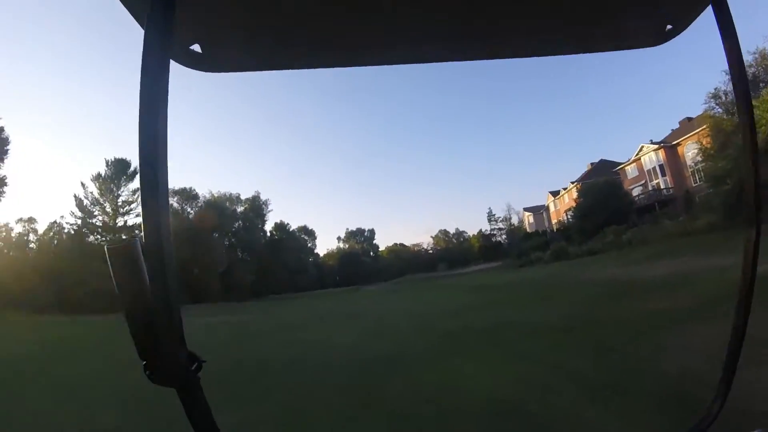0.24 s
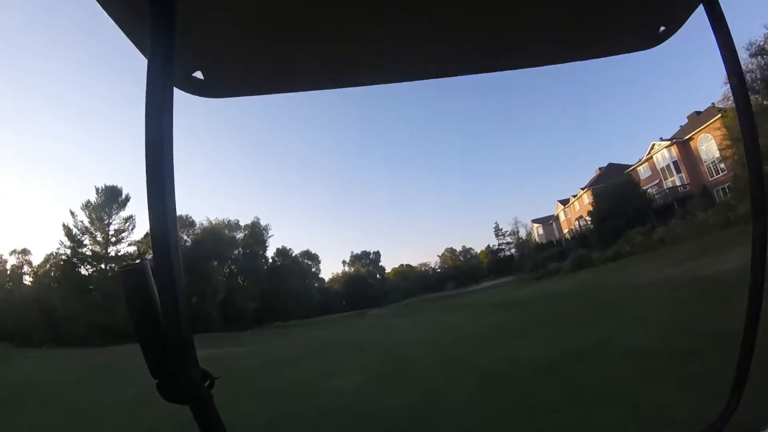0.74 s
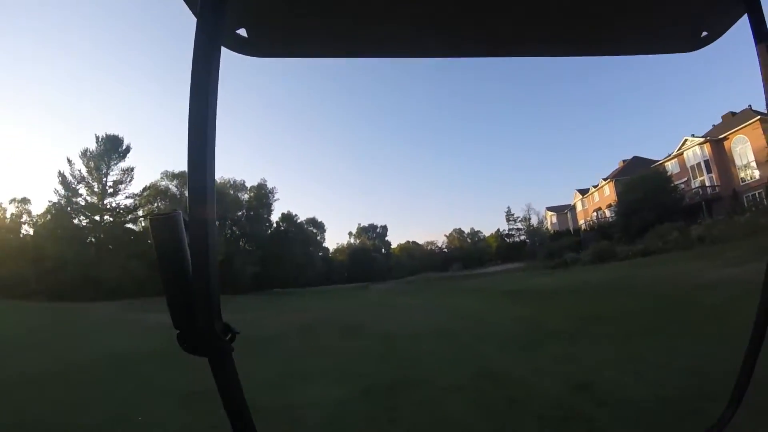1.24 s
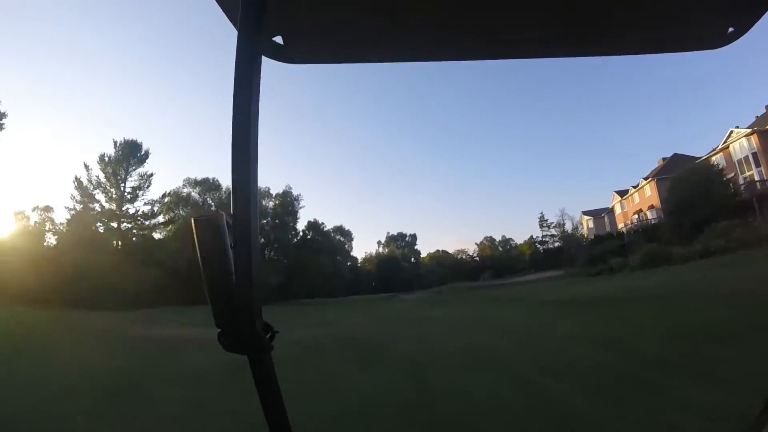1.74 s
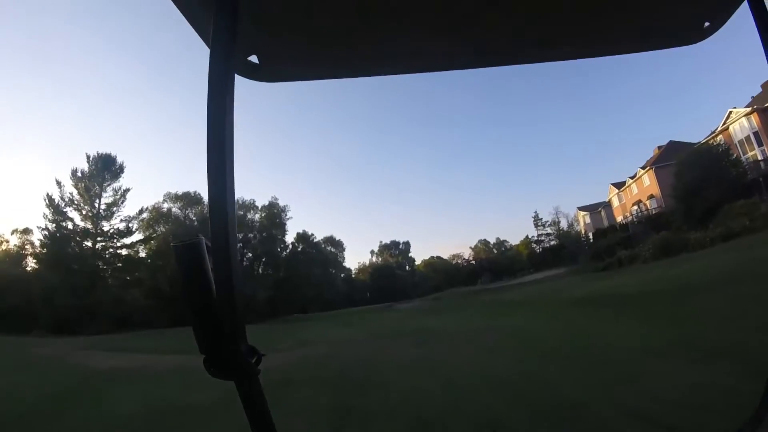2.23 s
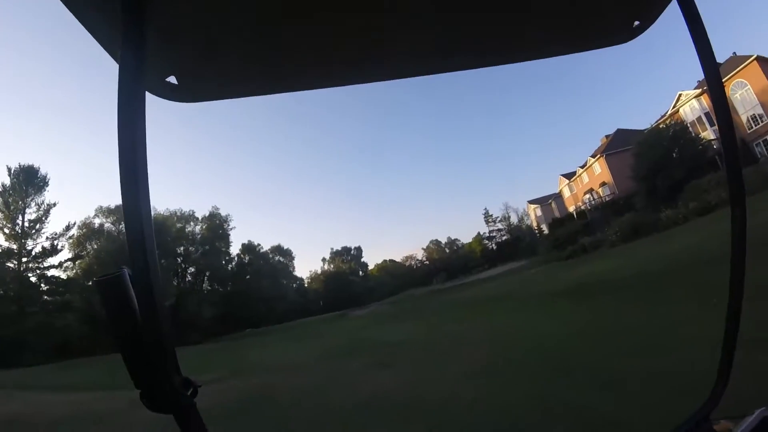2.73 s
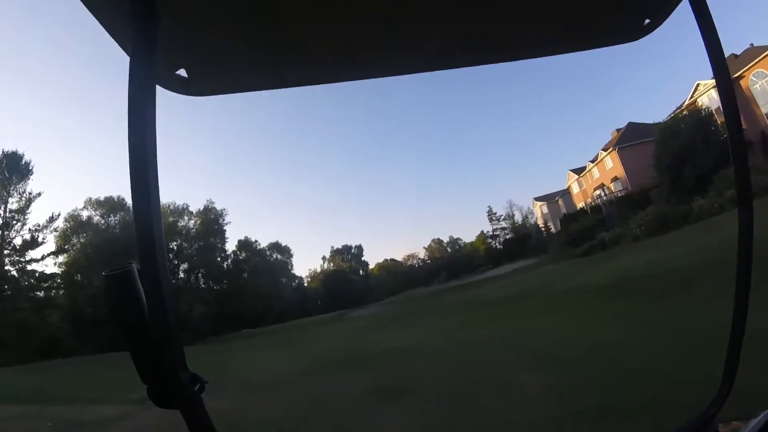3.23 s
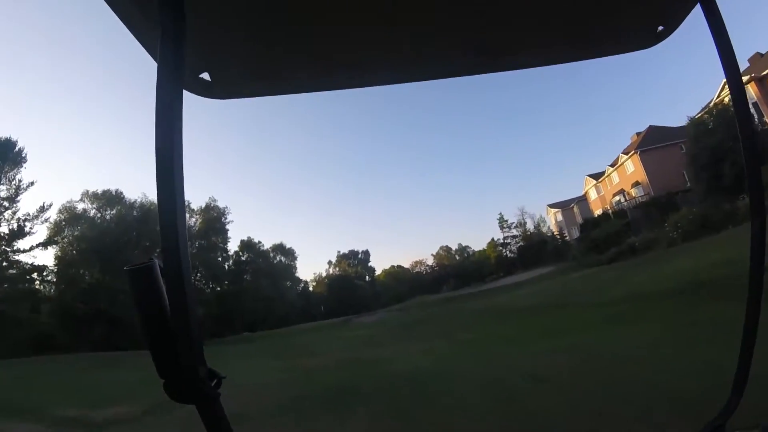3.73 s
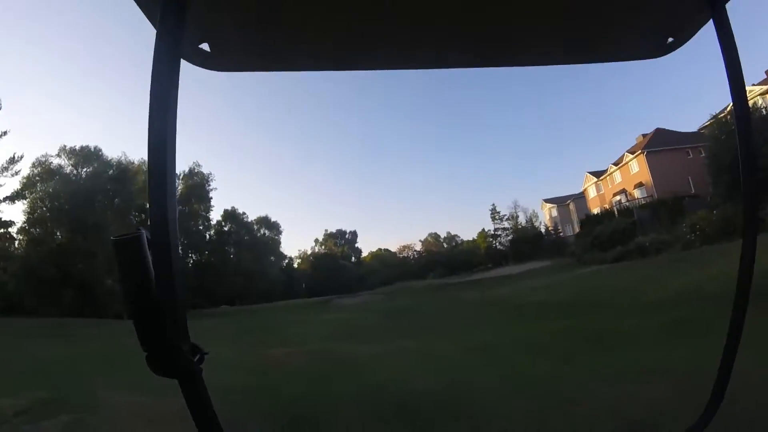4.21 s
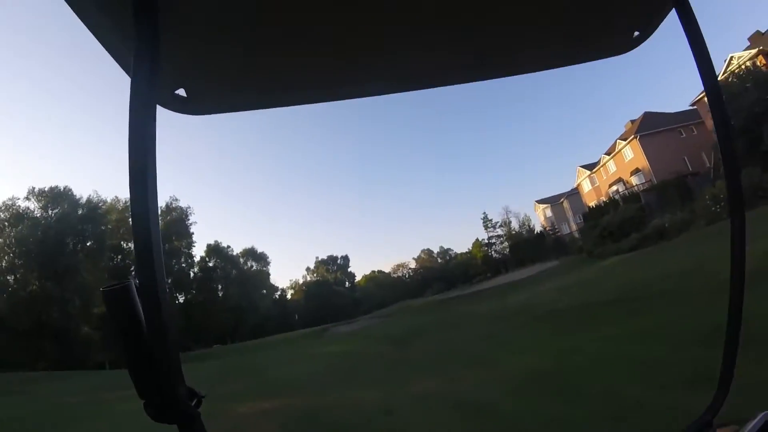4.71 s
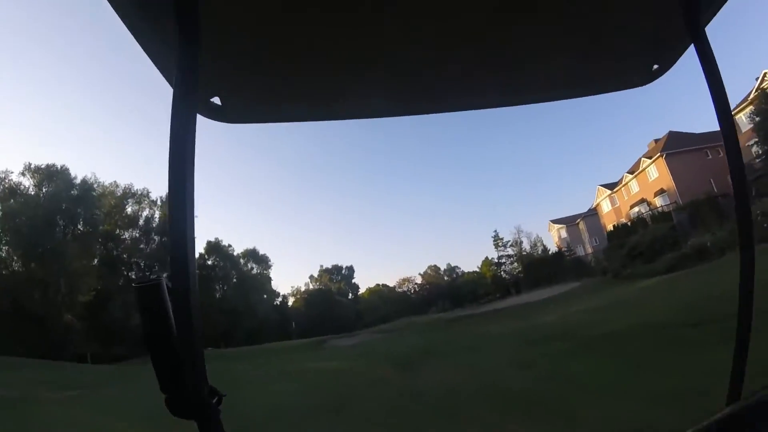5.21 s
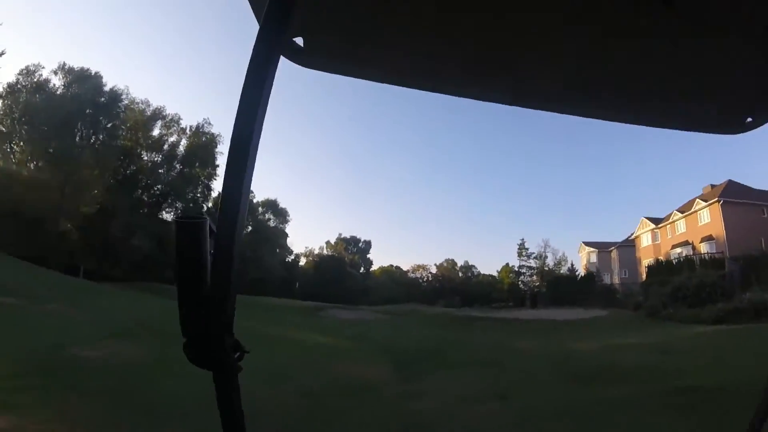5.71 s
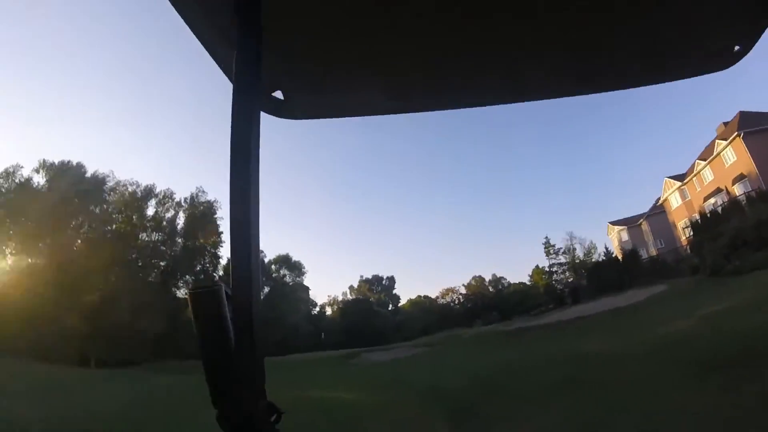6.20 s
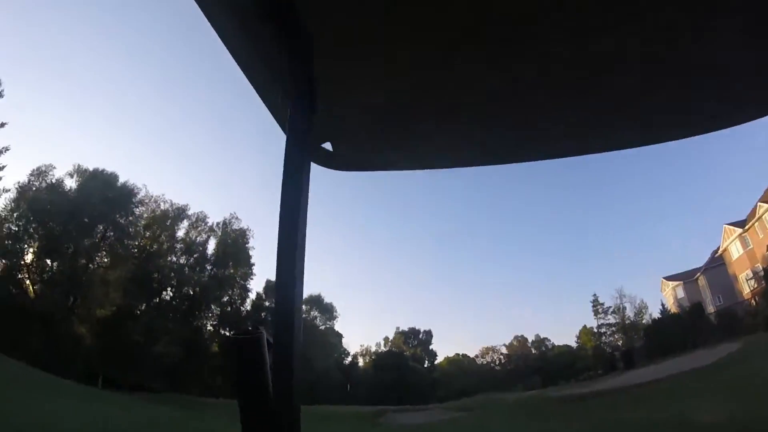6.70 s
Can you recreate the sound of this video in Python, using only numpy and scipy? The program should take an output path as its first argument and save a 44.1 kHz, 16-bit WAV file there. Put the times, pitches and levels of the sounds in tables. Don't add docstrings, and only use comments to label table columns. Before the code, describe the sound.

Low, boomy one-cylinder chugging and dull tyre roar on a small cart, deep bumps and plastic rattles, finishing with heavy knocks on the microphone's case.

```python
import sys
import numpy as np
from scipy import signal
from scipy.io import wavfile
from scipy.ndimage import uniform_filter1d

SR = 44100
rng = np.random.default_rng(int(sys.argv[2]) if len(sys.argv) > 2 else 0)


def wrap_up_sound(samples):
    columns = np.atleast_2d(samples).T
    tamed = np.clip(columns, -1, 1)
    steps = np.round(tamed * 32767).astype(np.int16)
    wavfile.write(sys.argv[1], SR, steps)


def rack_gain(trim_db):
    fader = np.asarray(trim_db, float)
    return 10 ** (fader / 20)


N = 306495


def in_time(rows):
    s, *columns = np.transpose(rows)
    return [np.interp(np.arange(N) / SR, s, c) for c in columns]


def rms_one(x):
    return x / np.sqrt(np.mean(x ** 2) + 1e-20)


def band_pass(x, order, edges_hz):
    return signal.sosfilt(signal.butter(order, edges_hz, "band", fs=SR, output="sos"), x)


def drift(rate_hz):
    r = np.exp(-80 * np.pi * rate_hz / SR)
    draws = rng.standard_normal(N // 40 + 2002)
    slow = signal.lfilter([1], [1, -2 * r, r * r], draws)[2000:]
    return np.interp(np.arange(N) / 40, np.arange(len(slow)), rms_one(slow))


def ring(clicks, hz, t60):
    r, w = rack_gain(-60 / (t60 * SR)), 2 * np.pi * hz / SR
    return signal.lfilter([0, np.sin(w)], [1, -2 * r * np.cos(w), r * r], clicks + 1e-18)


def resonance(x, hz, width):
    r = np.exp(-np.pi * width / SR)
    poles = [1, -2 * r * np.cos(2 * np.pi * hz / SR), r * r]
    return signal.lfilter(np.array([1, 0, -1]) * (1 - r * r) / 2, poles, x)


def add(track, at_s, sound):
    i = round(at_s * SR)
    track[i:i + len(sound)] += sound[:N - i]


# multiple of the firing rate, level in dB, start in turns.
SHAKE_ORDERS = [(1, -39, 0.14), (2, -16, 0.862), (3, -29.5, 0.43), (4, -29.5, 0.74)]
# time in seconds, gain in dB.
FRAME_UPTAKE = [(0, -0.5), (.3, -5.5), (.9, -2), (1.5, 1), (2.45, -2), (3.7, 2), (4.2, -2), (4.6, 2.5),
                (5.6, -2.5), (6.95, -5)]
# pitch in Hz, level in dB, t60 in seconds,
# delay in cycles.
ENGINE_MODES = [(117.4, -21, 0.064, 0.491), (165.3, -29, 0.17, .5), (188, -24.5, .16, .5),
                (241.5, -27, 0.15, 0.47), (384, -39, 0.39, .12),
                (852, -35, .13, .1)]


def engine(cycles, load_db):
    shake = 0
    for order, db, turn in SHAKE_ORDERS:
        shake = shake + rack_gain(db + drift(0.8)) * np.sin(2 * np.pi * (order * cycles + turn))
    out = rack_gain(in_time(FRAME_UPTAKE)[0]) * shake
    for hz, db, t60, late in ENGINE_MODES:
        jitter = 0.005 * drift(15)
        fired = np.diff(np.floor(cycles - late + jitter), prepend=0) > 0
        pulses = fired * rack_gain(1.4 * rng.standard_normal(N))
        out = out + rack_gain(db + load_db + 1.27 * drift(3.3)) * ring(pulses, hz, t60)
    return out


# time in seconds, teeth per second.
TOOTH_RATE = [(0, 132.2), (.75, 131.4), (1.1, 128.9), (2.2, 126.3), (3.4, 126.3), (4.5, 128.6),
              (5.2, 130.1), (5.65, 132.5), (6.05, 129.5), (6.95, 129.2)]
# multiple of the tooth rate, level in dB.
MESH_HARMONICS = [(3, -1), (4, -2), (5, -4), (6, -4), (7, -2.5), (8, -4), (11, -9), (19, -16), (23, -18)]
# time in seconds, level in dB.
TOOTH_TORQUE = [(0, 0.5), (1.2, -3.5), (2.3, 4.5), (3.3, -1.5), (4, -2.5), (5.5, 2), (6.2, -1), (6.95, 0)]


def gear():
    turns = np.cumsum(in_time(TOOTH_RATE)[0] * (1 + 0.001 * drift(6))) / SR
    lines = 0
    for k, db in MESH_HARMONICS:
        lines = lines + rack_gain(db + 3.0 * drift(3) - 2.5) * np.sin(2 * np.pi * k * turns)
    lines = lines + rack_gain(7) * resonance(lines, 865, 70)
    return rack_gain(-43.5 + in_time(TOOTH_TORQUE)[0]) * lines


# frequency in Hz, density in dB per Hz.
ROAR_SPECTRUM = [(55, -8), (98, -12), (190, -19.5), (323, -26), (420, -20), (740, -23.5), (1200, -29),
                 (2480, -34.5), (4000, -40), (4800, -60.5), (5700, -58.5), (8000, -57), (9800, -72.5),
                 (14000, -56.5)]
# pitch in Hz, width in Hz, level in dB.
CASE_RESONANCES = [(839.5, 47, 1.5), (6510, 520, 4.5), (11240, 260, -2.5),
                   (1290, 40, -4), (1435, 35, -1), (1755, 45, -1), (2140, 50, -4), (2300, 60, -3),
               (2510, 80, -1), (3015, 45, 0)]


def roar(cycles, firing):
    level_db, db_per_firing = -29, 3.5
    out, together, edges = 0, drift(9), 50 * 2 ** np.arange(0, 8.3, 1 / 3)
    white = rng.standard_normal((2, N))
    at_hz, density_db = np.transpose(ROAR_SPECTRUM)
    breath_db = 0.51 * np.cos(2 * np.pi * (cycles - 0.25))
    for k, (low, high) in enumerate(zip(edges, edges[1:])):
        band = band_pass(white[k % 2], 2, [low, high])
        colour_db = np.interp(np.log(low * high) / 2, np.log(at_hz), density_db)
        flicker_db = 0.45 * together + 0.38 * drift(7.4)
        out = out + band * rack_gain(colour_db + flicker_db + breath_db)
    out = out + sum(rack_gain(db) * resonance(out, hz, width) for hz, width, db in CASE_RESONANCES)
    return rack_gain(level_db + db_per_firing * (firing - firing.mean())) * rms_one(out)


# time in seconds, springs level in dB, frame level in dB.
GROUND_BUMPS = [(0.0, -23, -31), (.25, -21.5, -45), (.44, -21, -18.5), (.66, -35, -22), (.93, -13, -25),
                (1.11, -19, -34), (1.25, -40, -21.5), (1.47, -27, -23), (1.55, -14.5, -33),
                (2.08, -24, -37), (2.3, -29, -31), (2.48, -30, -16.5), (2.94, -12, -21), (3.36, -17, -31),
                (3.56, -19.5, -24), (3.88, -18.5, -36), (4.0, -36, -29), (4.22, -19.5, -22),
                (4.41, -15, -35), (4.93, -13, -34), (5.4, -30, -36), (5.62, -31, -32), (6.04, -28, -39),
                (6.55, -38, -19.5)]
# springs in seconds, frame in seconds.
SWELL_HALF_S = (0.087, 0.078)
# springs in dB, frame in dB.
TURF_LEVEL_DB = (-32.5, -34)


def bumps():
    out, t = 0, np.arange(N) / SR
    at_s, *levels_db = np.transpose(GROUND_BUMPS)
    bands_hz = [(13, 22.5), (24, 38.4)]
    for edges_hz, dbs, half, turf_db in zip(bands_hz, levels_db, SWELL_HALF_S, TURF_LEVEL_DB):
        deep = band_pass(rng.standard_normal(N + SR), 2, edges_hz)[SR:]
        even = deep / np.sqrt(uniform_filter1d(deep ** 2, size=8000) + 1e-12)
        swell = rack_gain(turf_db)
        for s, db in zip(at_s, dbs):
            swell = swell + rack_gain(db) * np.exp(-((t - s) / half) ** 2)
        out = out + swell * even
    return out


def blow(t, push_db, contact_ms, swing_db, hz, tick_db):
    contact = contact_ms / 1000
    push = -np.sin(np.pi * np.minimum(t / contact, 1)) ** 2
    later = np.maximum(t - 0.723 * contact, 0)
    swing = np.sin(2 * np.pi * hz * later) * rack_gain(-60 * later * hz / 4.56)
    lid = np.sin(2 * np.pi * 215 * later) * rack_gain(-60 * later / 0.087)
    swing = (swing + rack_gain(-19.5) * lid) * np.minimum(later / 0.001, 1)
    rough = 1 + 0.4 * rng.standard_normal(len(t))
    scrape = rough * np.sin(np.pi * np.minimum(t / 0.0007, 1))
    shell_hz = 800 + 2.7 * hz
    tick = -ring(scrape, shell_hz, 0.022) - rack_gain(-6) * ring(scrape, 640, 0.018)
    return rack_gain(push_db) * push + rack_gain(swing_db) * swing + rack_gain(tick_db - 19) * tick


# time in seconds, contact level in dB, swing level in dB,
# swing pitch in Hz.
HOLDER_RATTLES = [(0.064, -23, -20, 200), (0.101, -10, -27, 110), (0.241, -14, -18, 160),
                  (.47, -7.5, -18, 124), (.587, -13.5, -29, 159), (0.66, -13, -13, 135),
                  (.748, -10.5, -12, 162), (0.841, -17, -22, 150), (.909, -10, -14, 104),
                  (1.754, -28, -24, 270), (1.797, -29, -28, 270), (2.367, -3.5, -13.5, 116),
                  (2.4313, -4, -4.5, 80), (2.815, -12.5, -34, 220), (2.825, -29, -17, 188),
                  (2.881, -6.5, -6, 93), (2.967, -30, -22, 201), (3.15, -31, -35, 119),
                  (5.322, -30, -16, 102), (5.783, -7, -15, 189)]
# time in seconds, contact level in dB, contact in ms,
# swing level in dB, swing pitch in Hz.
HAND_KNOCKS = [
    (6.2205, -5, 4.5, 2, 92.6),
    (6.325, -15.5, 4, -4.5, 165),
    (6.5404, -11.5, 1.5, -6, 142),
    (6.603, -15, 3.8, -20, 101),
    (6.68, -41, 3, -9.5, 101),
    (6.769, -36, 2.9, -26, 202),
]
# start in seconds, level in dB, pitch in Hz, decay in seconds.
MOUNT_LURCHES = [(0.238, -12, 40.8, 0.05), (0.472, -14.5, 40, 0.12), (.909, -13, 39.3, 0.07),
                 (2.43, -14, 33.4, 0.18), (2.88, -18, 35.5, 0.21), (5.788, -24, 263, 0.18),
                 (5.794, -6.5, 73, 0.028), (6.33, -27, 252, 0.073), (6.339, -25, 60, 0.056),
                 (6.548, -24, 97.5, 0.56), (6.673, -8.5, 31.8, 0.19), (6.6759, -9.5, 80, 0.048),
                 (6.73, -17, 87, 0.19), (6.762, -21, 224.4, 0.064), (6.786, -21, 147, 0.073)]


def knocks():
    out, t = np.zeros(N), np.arange(SR // 4) / SR
    blows = [(s, push_db, 2.55, swing_db, hz) for s, push_db, swing_db, hz in HOLDER_RATTLES]
    blows += [tuple(row) for row in HAND_KNOCKS]
    for s, push_db, contact_ms, swing_db, hz in blows:
        sound = blow(t, push_db, contact_ms, swing_db, hz, tick_db=swing_db - 23)
        add(out, s - contact_ms / 2000, sound)
    for s, db, hz, t60 in MOUNT_LURCHES:
        fade = rack_gain(db - 60 * (t / t60) ** 2) * np.minimum(t / 0.0015, 1)
        add(out, s, fade * np.sin(2 * np.pi * hz * t))
    return signal.sosfilt(signal.butter(2, 2500, fs=SR, output="sos"), out)


# start in seconds, level in dB, t60 in seconds.
BRIGHT_CRACKS = [
    (.002, -33, .004),
    (5.473, -36, .006),
    (6.2185, -27, .012),
]
# lower edge in Hz, upper edge in Hz.
CRACK_BAND_HZ = (1500, 3500)


def cracks():
    out, t = np.zeros(N), np.arange(SR // 50) / SR
    for s, db, t60 in BRIGHT_CRACKS:
        add(out, s, rack_gain(db - 60 * t / t60) * rng.standard_normal(len(t)))
    return band_pass(out, 1, CRACK_BAND_HZ)


# centre in seconds, half length in seconds, level in dB.
CLOTH_BRUSH = (5.855, .025, -55)


def rustle():
    s, half, db = CLOTH_BRUSH
    hiss = band_pass(rng.standard_normal(N), 2, [4200, 8200])
    return rack_gain(db) * rms_one(hiss) * np.exp(-((np.arange(N) / SR - s) / half) ** 2)


# time in seconds, sudden change in dB.
GAIN_DUCKS = [
    (0.876, -1.5),
    (2.387, -2),
    (2.836, -5.5),
    (6.163, -17),
    (6.228, 2),
]


def gain_control():
    t, recover_s = np.arange(N) / SR, 1.56
    gain_db = 0
    for s, db in GAIN_DUCKS:
        gain_db = gain_db + db * (t >= s) * np.exp(-np.maximum(t - s, 0) / recover_s)
    return uniform_filter1d(rack_gain(gain_db), size=9)


# start in seconds, level in dB.
GAIN_CLICKS = [(2.387, -40), (2.8342, -30), (6.162, -24), (6.2262, -30)]


def step_clicks():
    out, t = np.zeros(N), np.arange(SR // 100) / SR
    for s, db in GAIN_CLICKS:
        add(out, s, rack_gain(db) * np.exp(-t / 0.0004))
    return out


def starved(x):
    hz, _, spec = signal.stft(x, SR, nperseg=512)
    chance = rms_one(uniform_filter1d(rng.standard_normal(spec.shape[-2:]), size=7, axis=1))
    threshold = np.interp(hz, [4000, 6000, 8000, 10000, 12000, 13800], [3.5, 2.0, 1.1, 0.3, 0.5, -0.8])
    kept = spec * (chance < threshold[:, None])
    return signal.istft(kept, SR, nperseg=512)[1][..., :N]


# time in seconds, firings per second.
ENGINE_SPEED = [(0, 23.12), (1.4, 23.17), (2.1, 23.25), (2.8, 23.42), (4.0, 23.63), (5.6, 23.78),
                (6.0, 23.6), (6.3, 23.4), (6.95, 23.45)]
# time in seconds, level in dB.
ENGINE_LOAD = [(0, -0.5), (.7, -0.5), (2.1, 2), (2.8, 1.5), (4.2, 1), (4.9, 1.5), (5.6, 0.5), (6.95, 2)]


def scene():
    firing, load_db = in_time(ENGINE_SPEED)[0], in_time(ENGINE_LOAD)[0]
    cycles = np.cumsum(firing) / SR
    drive = engine(cycles, load_db) + gear() + roar(cycles, firing)
    blows = (knocks() + cracks()) / gain_control()
    return (drive + bumps() + blows + rustle())[None]


def band_limit(x):
    return signal.sosfilt(signal.butter(12, 13950, fs=SR, output="sos"), x)


def record(dry):
    bass_cut = signal.sosfilt(signal.butter(1, 9, "high", fs=SR, output="sos"), dry)
    heard = bass_cut * gain_control() + step_clicks()
    limited = 1.2 * np.tanh(heard / 1.2)
    return band_limit(starved(limited))


dry = scene()
out = record(dry)
wrap_up_sound(out)
```